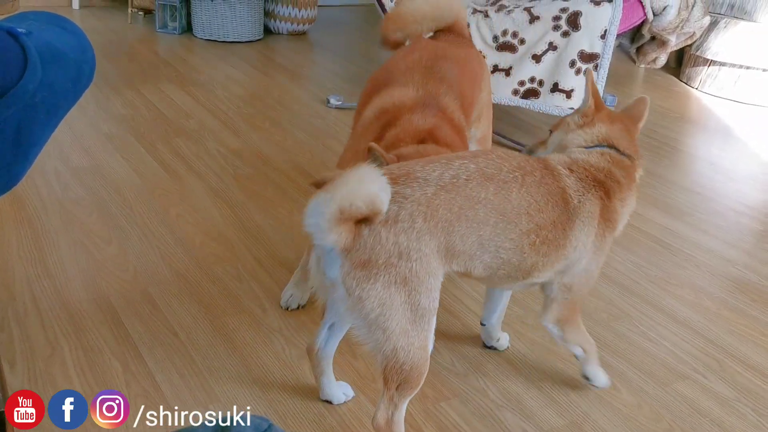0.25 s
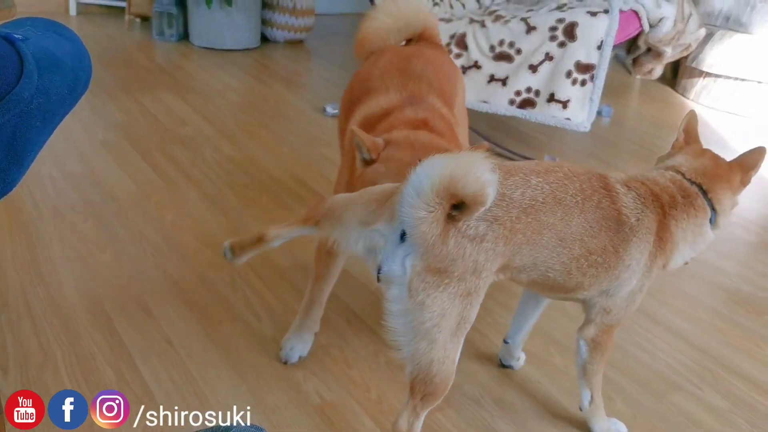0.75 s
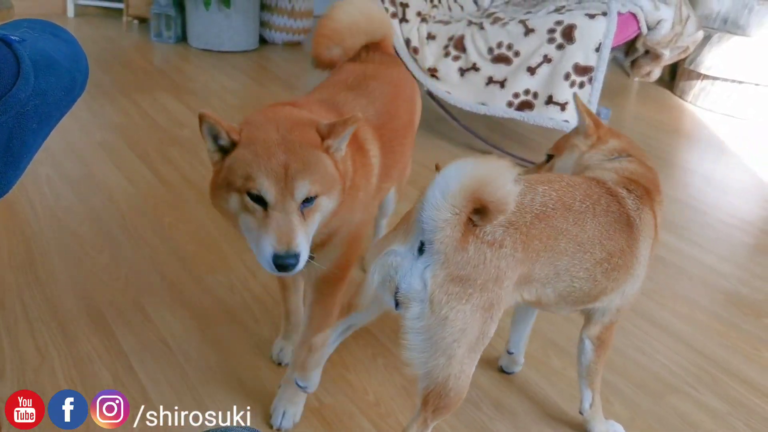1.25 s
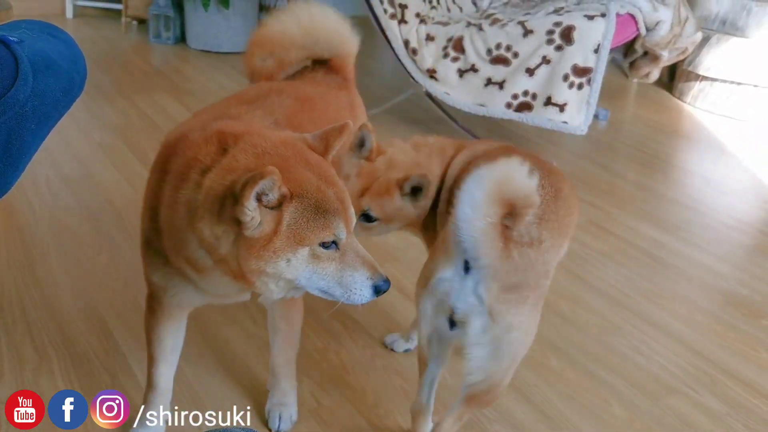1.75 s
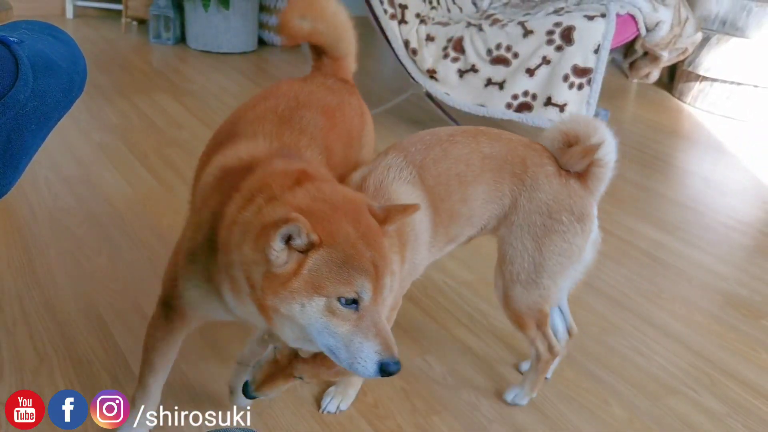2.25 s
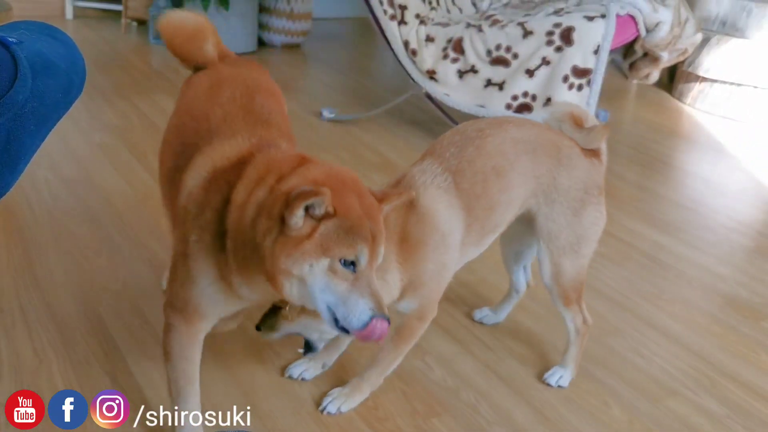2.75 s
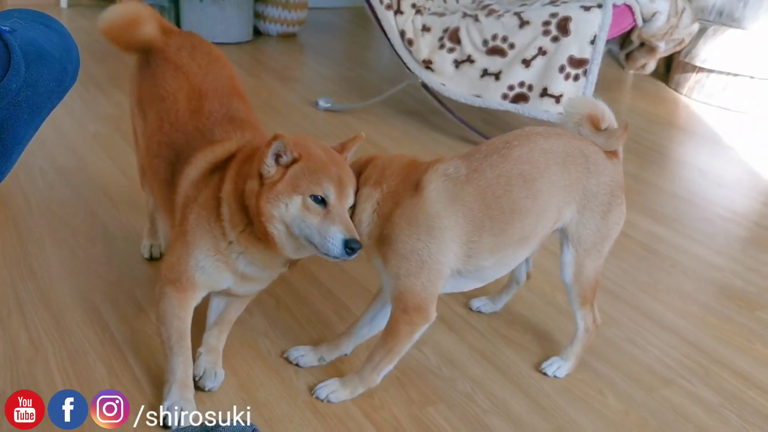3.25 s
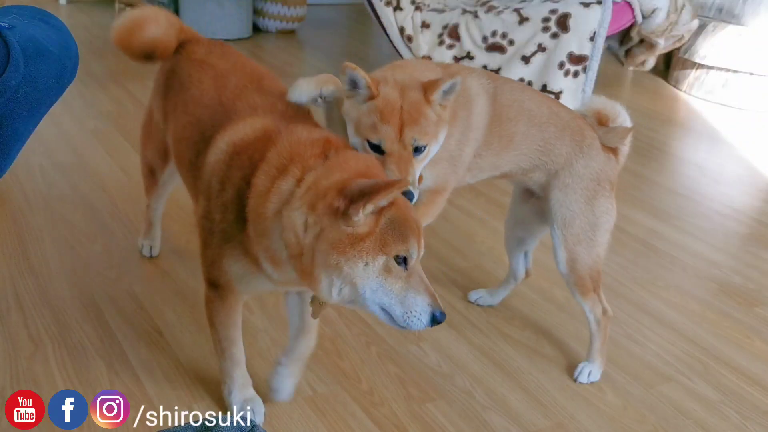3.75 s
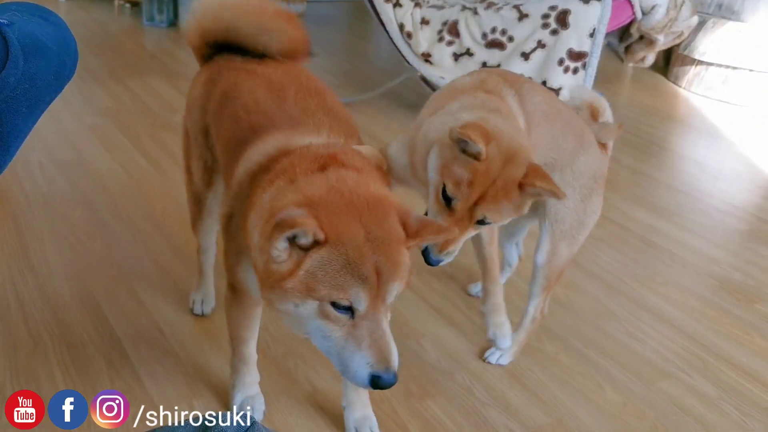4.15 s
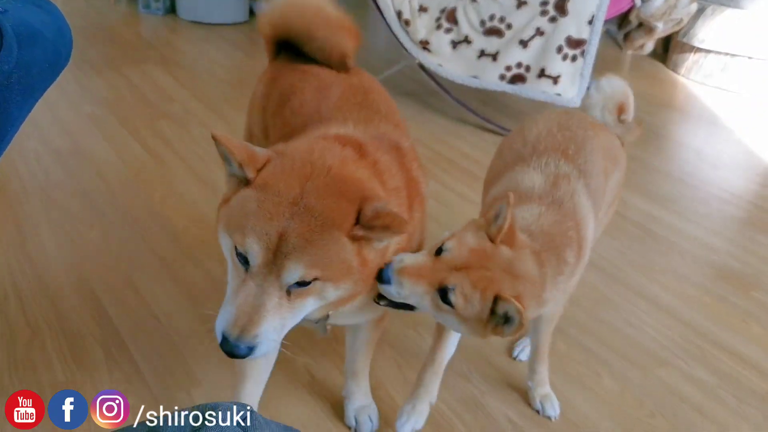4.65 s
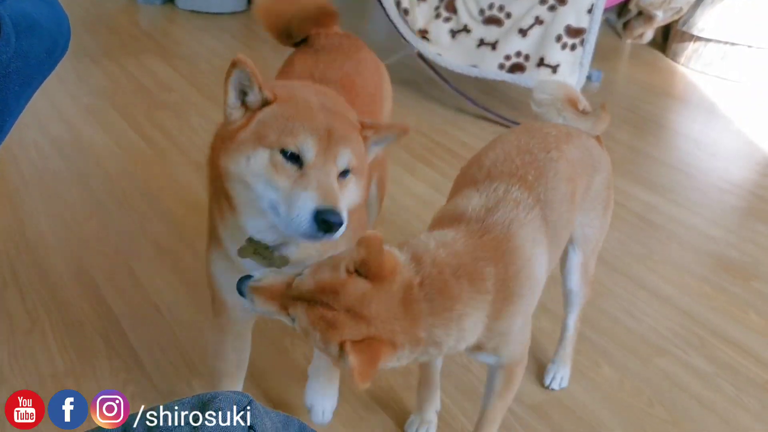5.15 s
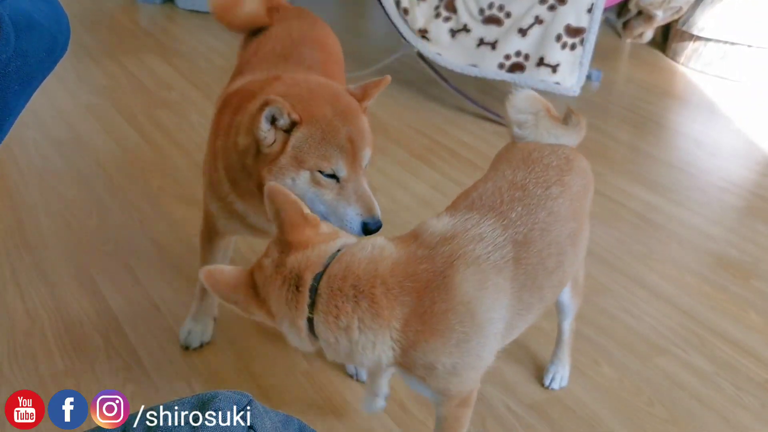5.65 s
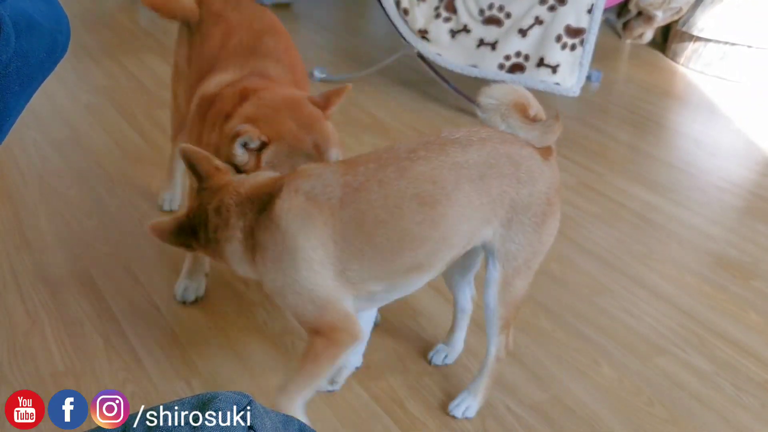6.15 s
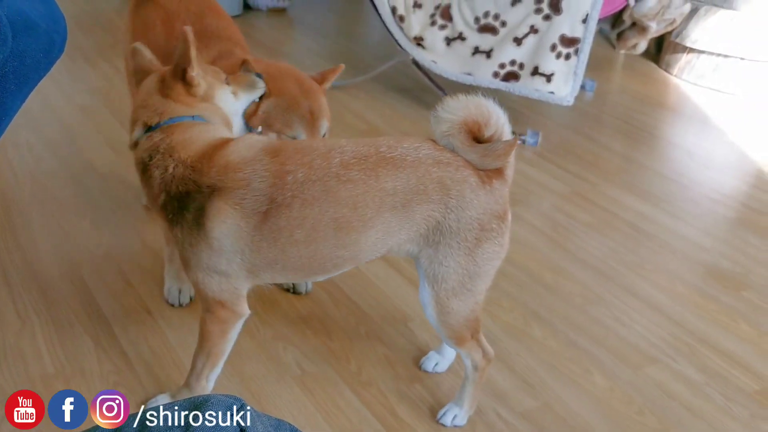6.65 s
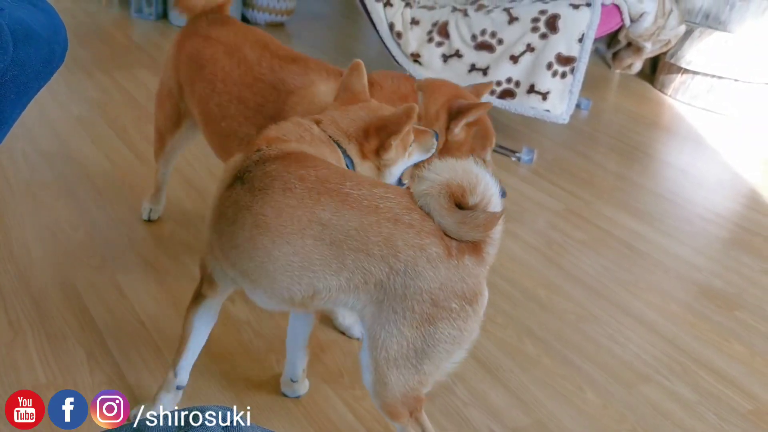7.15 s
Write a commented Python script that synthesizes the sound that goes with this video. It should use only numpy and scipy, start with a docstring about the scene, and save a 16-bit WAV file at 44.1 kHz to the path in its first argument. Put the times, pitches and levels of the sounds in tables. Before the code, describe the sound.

Sharp dog claws tick, skid and patter across hard boards close by, with a brief low growl, soft paw thuds and fur rustle.

```python
"""Dogs at play on a wooden floor

Two dogs tussle close to the microphone in a bare, echoing room. Stick-slip friction and impact ring
their claws and the boards; damped board notes give soft pads and hollow knocks; fur rustles past.
A loose collar fitting tinkles twice as narrow bands of noise, and two very bright snaps are short sines.
A low harmonic grumble sinks in pitch at the start, over floor booms, a faint rumble and room hiss."""
import sys
import numpy as np
from scipy import signal
from scipy.fft import rfft, irfft, next_fast_len
from scipy.io import wavfile
from scipy.ndimage import uniform_filter1d

SR = 44100
rng = np.random.default_rng(int(sys.argv[2]) if len(sys.argv) > 2 else 0)


def dump_mix(stems):
    """Bounce the given channels to the path in sys.argv[1] as a 16-bit WAV at rate SR."""
    frames = np.atleast_2d(stems).T  # one column per channel
    limited = np.clip(frames, -1, 1)  # hard clip at full scale
    pcm = np.round(limited * 32767).astype(np.int16)
    wavfile.write(sys.argv[1], SR, pcm)


N = 325878  # samples

# All event and spectrum levels below are relative; each source sets its own final gain.
# claws landing: (time [s], level [dB], treble snap [dB], left over right [dB])
CLAW_LANDINGS = [(0.2259, -22, -34, 3), (0.2445, -20.5, -21, -21), (0.376, -26, -15, -6),
                 (0.5437, -25, -5.5, -8), (0.618, -25, -16, -10), (0.629, -17.5, -16, -5),
                 (0.9587, -49, -15, -6), (1.2682, -28.5, -12, -9), (1.7514, -25.5, -4, -7),
                 (1.9508, -23, -22, -26.5), (1.9574, -21.5, -14, 4), (1.9994, -24, -4, -16),
                 (2.2866, -17, -22, -18.5), (2.294, -18.5, -5.5, 0), (2.5251, -16.5, -10, -9),
                 (2.6247, -17.5, -8, -7), (2.7525, -20.5, -26, 7), (2.8725, -22.5, -13.5, -6),
                 (2.8874, -33, -15, -24), (3.1018, -35, -10, -2), (3.1579, -20, -11, -8),
                 (3.5722, -31.5, -14, -1), (3.6651, -36.5, -13, -23), (3.742, -35, -9, -16),
                 (3.7792, -26.5, -9, -5), (4.0022, -24.5, -37, -4), (4.14, -37.5, -12.5, -11),
                 (4.566, -33, 1, -6), (4.6024, -21, -7.5, -7), (5.1582, -34, -25, -6),
                 (5.4864, -14.5, -5.5, -7.5), (5.679, -28.5, -11, -4), (5.7418, -21, -13, -1),
                 (5.7546, -25, -13.5, -14), (6.0689, -39, -12, -11), (6.1871, -16.5, -5, 0),
                 (6.2004, -28, -17, -7), (6.331, -15.5, -14, -12), (6.3489, -25.5, -5.5, 8),
                 (6.5235, -30.5, -5.5, 0), (6.7222, -38.5, -6.5, -7.5), (7.1052, -23.5, -18, -17),
                 (7.2771, -23.5, -3, -2), (7.2825, -25.5, -20, -16)]
# claws skidding: (time of hardest push [s], level [dB], rise [s], fall [s], pitch factor [ratio],
# left over right [dB])
CLAW_SKIDS = [(0.005, -38.5, 0.0088, 0.025, 0.98, -14), (0.243, -26, 0.012, .006, 1.06, -16),
              (0.41, -40, 0.032, .016, 1, -15), (0.72, -42.5, 0.051, 0.025, 0.89, -15),
              (1.296, -25.5, 0.009, 0.006, 0.93, -23), (1.437, -28, .0105, .006, 0.86, -16.5),
              (2.036, -32, 0.016, 0.0059, 0.99, -18), (2.121, -19.5, 0.0041, 0.014, 0.98, -7),
              (2.14, -23, .008, .02, 0.95, -19), (2.167, -23, .013, .015, 0.93, -3),
              (2.553, -33.5, 0.022, 0.0089, 0.94, 0), (2.645, -28, .013, 0.0078, 1.01, 6),
              (2.70, -28.5, 0.013, .01, 0.91, -12), (2.762, -26, .01, .0042, 1.08, -13),
              (2.94, -44, .028, 0.033, 1.03, -16), (3.178, -39.5, 0.0091, 0.056, 0.92, -16),
              (4.02, -38, 0.0086, 0.0044, 1.09, -23), (4.603, -35, .0066, 0.0023, 0.87, -4),
              (4.755, -29, .012, 0.013, .8, -4), (4.783, -26, .014, 0.0094, 0.73, -14.5),
              (4.935, -48, 0.011, 0.031, .98, -19.5), (5.176, -35.5, 0.0084, 0.0052, 0.98, -13.5),
              (5.224, -49, .012, .012, 1.08, -15), (5.626, -34, 0.01, 0.012, 0.92, -10),
              (5.80, -43.5, 0.028, 0.057, 1, -10), (6.39, -35, 0.031, .017, 0.88, -10),
              (7.065, -45.5, 0.035, 0.0086, 0.94, -4)]
# sharp snaps right by the microphone: (time [s], level [dB])
CLOSE_SNAPS = [(4.602, 2), (4.6066, -5)]
# pads landing on the boards: (time [s], level [dB], weight as lower over upper board note [dB])
PAD_LANDINGS = [(0.06, -46.5, 13), (0.139, -46, 8), (0.445, -50, 13), (2.30, -46, -6), (2.391, -53, -13),
                (2.47, -49.5, -6), (2.61, -55, -10), (2.70, -55.5, -15), (2.88, -55, -16), (3.37, -52, 5),
                (3.905, -51.5, 13), (4.602, -47, 1), (4.781, -53.5, -17), (6.05, -56.5, -6),
                (6.179, -50.5, 6), (6.29, -55.5, -4), (7.283, -49.5, 1.5)]
# collar tinkles: (time [s], level [dB], gain of the two lower notes [dB])
COLLAR_TINKLES = [(0.042, -33, -3.5), (5.347, -37, -22)]
# modes of the collar fitting: (frequency [Hz], level [dB], 60 dB decay time [s])
COLLAR_MODES = [(9600, 8.5, 0.053), (11100, 2, 0.12), (13440, -8, .22), (14150, -16, .14), (15450, -2, .1)]
# spectrum of a claw on the boards: (frequency [Hz], level [dB])
CLAW_SPECTRUM = [(100, -42), (400, -26), (750, -13.5), (1150, -13.5), (1800, -9.5), (2600, -4),
                 (3500, -2.5), (4600, 0.5), (5700, -3.5), (6600, -3), (7700, -11.5), (9500, -11.5),
                 (11500, -12.5), (15500, -23.5)]
# decay of the room: (frequency [Hz], 60 dB decay time [s])
ROOM_DECAY = [(150, 2.4), (700, 0.85), (1800, 0.7247), (4300, 0.6172), (8000, 0.55), (14000, 0.59)]
# spectrum of the late reverberation: (frequency [Hz], level [dB])
ROOM_SPECTRUM = [(150, -29), (750, 0.5), (1500, -4.5), (3000, 0.5), (4200, 4), (5800, 2), (8000, -1),
                 (14000, -8)]
# still air of the room: (frequency [Hz], level per Hz [dB])
AIR_SPECTRUM = [(15, -2), (25, 3), (45, 1), (62, -1), (84, 2.5), (110, -5), (170, -15), (260, -16),
                (450, -26.5), (800, -27.5), (2000, -33.5), (4500, -35.5), (7700, -43), (15000, -44)]
# likeness of left and right in a diffuse field: (frequency [Hz], correlation [ratio])
COHERENCE = [(60, 1), (150, 0.89), (300, 0.66), (700, 0.26), (2000, 0.013)]
# bearing of the paws: (time [s], lag of the left port [samples])
PAW_BEARING = [(0, 0), (1, 1), (2.1, 12), (4.3, 0), (5.2, 7), (7.3, 9)]
# extra bite of a claw that faces the microphone: (frequency [Hz], gain [dB])
FACING_BITE = [(1000, 5), (3300, 3), (4500, 2.5), (5600, 7.5), (7500, 0.5), (12000, 1)]
# fur and soft pads brushing past: (time of hardest push [s], level [dB], length scale [s])
FUR_BRUSHES = [(0.12, -48.5, 0.15), (1.2, -47.5, .1), (2.451, -46.5, 0.15), (3.316, -54, 0.047),
               (3.632, -47.5, 0.091), (3.946, -41, .08)]
# notes of the boards under a pad: (frequency [Hz], half-width [Hz], level [dB], decay constant [s])
BOARD_NOTES = [(226, 125, -1.5, 0.062), (775, 166, 4, 0.032)]
# short hollow knocks: (time [s], level [dB], pitch [Hz])
HOLLOW_KNOCKS = [(0.438, -36, 1126), (0.54, -37.5, 720), (2.03, -35, 860), (4.086, -44.5, 870),
                 (4.78, -33.5, 850), (5.345, -37.5, 1480)]
# floor booms as the dogs shift their weight: (time [s], level [dB])
FLOOR_BOOMS = [(1.56, -37.5), (1.79, -41.5), (2.1, -45.5), (2.9, -44), (3.6, -46.5), (3.78, -46),
               (4.04, -46), (4.48, -44.5), (5.36, -39), (5.85, -41.5), (6.22, -38), (6.5, -37.5),
               (6.84, -41), (7.19, -42.5)]

CLATTER_S = 0.0036  # decay constant of a soft landing's clatter, as the paw's other claws follow
FIRM_DB, CLATTER_HALVES_DB = -22.5, 11  # above this level a flatter paw halves the clatter per 11 dB
KNOCK_DB, KNOCK_PER_SNAP = -10.5, 0.49  # a harder landing also knocks the board more (dB per dB)
TAP_ROOM_DB, ROOM_PER_LEVEL = 1.37, -0.098  # fainter taps are further off: more room (dB per dB)
SKID_SNAP_DB, SNAP_DB_PER_OCTAVE = -9.5, 27  # a faster, higher skid also has more treble
SKID_BOARD_DB, BOARD_PER_LEVEL = -27.5, -0.28  # a hard skid rasps more than it knocks (dB per dB)
GRUMBLE_END_S, GRUMBLE_RELEASE_S = 0.779, 0.022
GRUMBLE_HZ, SAG_HZ_PER_S = 95.8, 40  # mean pitch at the start and its steady fall
GRUMBLE_DB, SWELL_DB_PER_S = -45.5, 9.5
BOOM_HZ, BOOM_HALF_WIDTH_HZ, BOOM_SWELL_S = 36.1, 7.4, 0.11
HISS_DB = -46.5
EDGE_HZ = 15750


def amp(db):
    """Logarithmic level: decibels become a linear gain."""
    return 10 ** (np.asarray(db) / 20)


def evened(x):
    """Power normalization: scales a signal to rms 1."""
    return x / np.sqrt(np.mean(x ** 2) + 1e-20)


def read(points, hz):
    """Logarithmic frequency scale: joins spectrum points with straight lines upon it."""
    f, value = np.transpose(points)
    return np.interp(np.log(hz + 1), np.log(f + 1), value)


def add(mix, s, sound):
    """Superposition: adds a stereo sound to the mix at time s, clipped to its bounds."""
    start = round(s * SR)
    sound = sound[:, max(-start, 0):]
    part = mix[:, max(start, 0):][:, :sound.shape[1]]
    part += sound[:, :part.shape[1]]


def causal(gain, size=1024):
    """Minimum phase: the quickest-starting impulse response with this spectrum."""
    log_gain = np.log(np.maximum(np.r_[gain, gain[-2:0:-1]], 1e-5))
    return np.fft.ifft(np.exp(np.conj(signal.hilbert(log_gain)))).real[:size]


def ringing_noise(hz, half_width_hz, size):
    """Resonance: white noise through one peak, down to half amplitude at the half-width, rms 1."""
    f = np.fft.rfftfreq(size, 1 / SR)
    peak = 1 / (1 + ((f - hz) / half_width_hz) ** 2)
    return evened(irfft(rfft(rng.standard_normal(size)) * peak, size))


def placed(sound, pan_db, s=0):
    """Interaural-style cues: a level difference, and a left lag as the dogs move about to the right."""
    lag = round(np.interp(s, *np.transpose(PAW_BEARING)))
    left = np.pad(sound, (lag, 0)) * amp(pan_db / 2)
    right = np.pad(sound, (0, lag)) * amp(-pan_db / 2)
    return np.array([left, right])


def claw(force, snap_db, board_db, grain_db, uneven_db, pitch=1):
    """Stick-slip excitation: tiny slips under a force ring claw and board, beamed and spread."""
    hz = np.fft.rfftfreq(2048, 1 / SR)
    treble = read([(6200, 0), (9000, snap_db + 16.5)], hz)
    bass = read([(900, board_db + 21), (2500, 0)], hz)
    colour = read(CLAW_SPECTRUM, hz / pitch) + treble + bass
    grain = amp(grain_db * np.minimum(rng.exponential(1, len(force)), 3))
    slips = force * rng.standard_normal(len(force)) * grain
    # the slips are so brief that together they excite all pitches evenly
    spectrum = rfft(np.pad(slips, (64, 512)))
    power = uniform_filter1d(abs(spectrum) ** 2, size=len(spectrum) // 26)
    slips = irfft(spectrum / np.sqrt(abs(power) + 1e-20))[48:]
    # each contact beams some pitches more than others; over all directions this averages out
    lobes = np.interp(hz, [800, 3000], [0, 1])  # long waves spread evenly
    unevenness = evened(uniform_filter1d(rng.standard_normal(len(hz)), size=22))
    beam = read(FACING_BITE, hz) + uneven_db * lobes * unevenness
    sounds = np.array([signal.fftconvolve(slips, causal(amp(db))) for db in (colour + beam, colour)])
    return sounds * np.linalg.norm(force) / np.linalg.norm(sounds, axis=1, keepdims=True)


def rung(sound, amount, ring_hz=5300, ring_q=4, ring=2.9):
    """Modal ringing: the claw's own note stands out of a contact, at unchanged total energy."""
    note = signal.lfilter(*signal.iirpeak(ring_hz, ring_q, SR), sound)
    out = sound + ring * amount * note
    return out * np.linalg.norm(sound) / np.linalg.norm(out)


def stroke(rise, fall, catch_db):
    """Stick-slip force: it builds, lets go and catches every few milliseconds; also its lead in s."""
    t = np.arange(-3 * rise, 4 * fall, 1 / SR)
    push = np.exp(np.where(t < 0, t / rise, -t / fall))
    force = push * amp(catch_db * ringing_noise(316, 140, len(t)))
    return force * np.linalg.norm(push) / np.linalg.norm(force), -t[0]


def thud(hz, half_width_hz, decay, rise=0.00087, judder_db=4):
    """Damped resonance: one dull note of wood that judders as it dies."""
    t = np.arange(SR // 3) / SR
    blow = (1 - np.exp(-t / rise)) * np.exp(-t / decay)
    judder = amp(judder_db * ringing_noise(24, 63, len(t)))
    note = blow * judder * ringing_noise(hz, half_width_hz, len(t))
    return note * np.linalg.norm(blow) / np.linalg.norm(note)


def air():
    """Diffuse field: steady rumble, alike in both ports, and a hiss that is largely independent."""
    size = next_fast_len(N)
    hz = np.fft.rfftfreq(size, 1 / SR)
    a, b = rfft(rng.standard_normal((2, size))) * amp(read(AIR_SPECTRUM, hz))
    same = np.clip(read(COHERENCE, hz), -1, 1)
    right_db = read([(120, -2.5), (500, 2.5), (6000, 2.5), (12000, 6.0)], hz)
    right = (same * a + np.sqrt(1 - same ** 2) * b) * amp(right_db)
    return amp(HISS_DB) * evened(irfft([a, right], size)[:, :N])


def grumble(jitter=0.095, shimmer=0.48, overtone_db=-13, rasp_db=-13):
    """Harmonic series: an unsteady low tone sinks, swells and stops, with weak overtones and rasp."""
    t, out = np.arange(SR) / SR, np.zeros((2, N))
    pitch_hz = (GRUMBLE_HZ - SAG_HZ_PER_S * t) * (1 + jitter * ringing_noise(18.7, 9.6, len(t)))
    turns = np.cumsum(pitch_hz) / SR
    overtones = sum(np.sin(2 * np.pi * k * turns) / np.sqrt(k) for k in range(2, 5))
    tone = np.sin(2 * np.pi * turns) + amp(overtone_db) * overtones
    rasp = amp(rasp_db) * ringing_noise(270, 110, len(t))
    sound = evened(tone) * amp(SWELL_DB_PER_S * t) + rasp
    release = np.exp(-np.maximum(t - GRUMBLE_END_S, 0) / GRUMBLE_RELEASE_S)
    flutter = 1 + shimmer * ringing_noise(7.9, 5.9, len(t))
    add(out, 0, placed(amp(GRUMBLE_DB) * sound * release * flutter, 3.0))
    return out


def skids(level_db=-1):
    """Stick-slip friction: a paw pushes harder until its claws let go, catching on the grain."""
    near, far = np.zeros((2, 2, N))
    for s, db, rise, fall, pitch, pan_db in CLAW_SKIDS:
        force, lead = stroke(rise, fall, catch_db=3.5)
        snap_db = SKID_SNAP_DB + SNAP_DB_PER_OCTAVE * np.log2(pitch)
        board_db = SKID_BOARD_DB + BOARD_PER_LEVEL * db
        contact = claw(force, snap_db, board_db, grain_db=7.5, uneven_db=1.6, pitch=pitch)
        beamed, spread = amp(db + level_db) * contact
        brief = np.interp(rise + fall, [.012, .024], [1, 0])  # a quick flick leaves the claw free to ring
        add(near, s - lead, placed(rung(beamed, brief), pan_db, s))
        add(far, s - lead, spread[None])
    return np.array([near, far])


def brushes(level_db=-1, rise_share=.35, fall_share=0.7, pan_db=-7, room_db=2):
    """Broadband friction: fur and pads slide softly in a rustle with little of the claws' note."""
    near, far = np.zeros((2, 2, N))
    for s, db, length in FUR_BRUSHES:
        force, lead = stroke(rise_share * length, fall_share * length, catch_db=1)
        contact = claw(force, snap_db=-5.5, board_db=-3.0, grain_db=5.5, uneven_db=-4.2)
        beamed, spread = amp(db + level_db) * contact
        add(near, s - lead, placed(beamed, pan_db, s))
        add(far, s - lead, spread[None] * amp(room_db))
    return np.array([near, far])


def patter(level_db=-24, spread_s=0.041, decay_s=0.001, room_db=-4, count=3):
    """Random impacts: around each skid, single claws tick lightly at scattered times and levels."""
    near, far = np.zeros((2, 2, N))
    force = np.exp(-np.arange(256) / SR / decay_s)
    draws = rng.standard_normal((len(CLAW_SKIDS), count, 2))
    for (s, db, *_, pan_db), ticks in zip(CLAW_SKIDS, draws):
        for offset, size in ticks:
            at = s + spread_s * (.6 + offset)
            tick = claw(force, snap_db=-11, board_db=-17, grain_db=7.5, uneven_db=5)
            beamed, spread = amp(level_db + 0.41 * db + 2 * size) * tick
            add(near, at, placed(beamed, pan_db, at))
            add(far, at, spread[None] * amp(room_db))
    return np.array([near, far])


def tinkles(half_width_hz=170, room_db=-4):
    """Modal decay: a small, loose metal fitting rattles in high, brief bands of noise."""
    out, t = np.zeros((2, N)), np.arange(SR // 2) / SR
    for s, level_db, low_db in COLLAR_TINKLES:
        ring = np.zeros(len(t))
        for k, (hz, db, t60) in enumerate(COLLAR_MODES):
            decay_db = db + low_db * (k < 2) - 60 * t / t60
            ring += amp(decay_db) * ringing_noise(hz, half_width_hz, len(t))
        add(out, s, amp(level_db - 10) * placed(ring, -10.0, s))
    return np.array([out, out * amp(room_db)])


def pads(room_db=-2):
    """Soft impact: paws ring the boards, and more weight favours the lower note."""
    out = np.zeros((2, N))
    for s, level_db, weight_db in PAD_LANDINGS:
        notes = sum(amp(db + lean * weight_db) * thud(hz, half_width, decay)
                    for (hz, half_width, db, decay), lean in zip(BOARD_NOTES, (.5, -.5)))
        add(out, s, amp(level_db) * placed(notes, 0, s))
    return np.array([out, out * amp(room_db)])


def taps(level_db=-6.0, strike=1.55, strike_s=0.00054, rise_s=0.00045, near_pan_db=-2):
    """Hard impact: one claw strikes and others clatter after; a blunt landing rings more than snaps."""
    near, far = np.zeros((2, 2, N))
    t = np.arange(SR // 16) / SR
    for s, db, snap_db, pan_db in CLAW_LANDINGS:
        quick = 2 ** (max(db - FIRM_DB, 0) / CLATTER_HALVES_DB)
        clatter = np.exp(-t * quick / CLATTER_S)
        force = (clatter + strike * np.exp(-t / strike_s)) * (1 - np.exp(-t / rise_s))
        board_db = KNOCK_DB + KNOCK_PER_SNAP * snap_db
        contact = claw(force * np.sqrt(quick), snap_db, board_db, grain_db=5.5, uneven_db=6)
        beamed, spread = amp(db + level_db) * contact
        blunt = np.interp(snap_db, [-24, -10], [1, 0])
        add(near, s, placed(rung(beamed, blunt), pan_db + near_pan_db, s))
        add(far, s, spread[None] * amp(TAP_ROOM_DB + ROOM_PER_LEVEL * db))
    return np.array([near, far])


def knocks(half_width=0.24, decay=0.0077, room_db=-1):
    """Heavily damped resonance: brief hollow knocks as the dogs bump about."""
    out = np.zeros((2, N))
    for s, db, hz in HOLLOW_KNOCKS:
        add(out, s, amp(db) * placed(thud(hz, half_width * hz, decay), 0.27, s))
    return np.array([out, out * amp(room_db)])


def boom(pan_db=2):
    """Fundamental mode: the whole floor sways at its lowest note as the dogs shift their weight."""
    t = np.arange(N) / SR
    sway = signal.hilbert(ringing_noise(BOOM_HZ, BOOM_HALF_WIDTH_HZ, next_fast_len(N)))[:N]
    sway = evened(sway.real / (abs(sway) + 0.31))  # evens out the random envelope
    swell = sum(amp(db) * np.exp(-((t - s) / BOOM_SWELL_S) ** 2) for s, db in FLOOR_BOOMS)
    return placed(sway * swell, pan_db)[:, :N]


def snaps(hz=12000, peak_s=0.0001, pan_db=-7, room_db=-5):
    """Transient oscillation: a hard, very bright tick only a few cycles long."""
    out, t = np.zeros((2, N)), np.arange(SR // 100) / SR
    tick = t / peak_s * np.exp(1 - t / peak_s) * np.sin(2 * np.pi * hz * t)
    for s, db in CLOSE_SNAPS:
        add(out, s, amp(db - 8.5) * placed(tick, pan_db, s))
    return np.array([out, out * amp(room_db)])


def room(x, tail_db=-0.5, early_db=-6, early_s=0.0074, build_s=0.0061, pan_db=-2):
    """Reverberation: quick bounces off floor and furniture, then a long bright tail from bare walls."""
    t = np.arange(SR) / SR
    mono, out = x.mean(0), np.zeros((2, N))
    for k in range(3):
        # the dogs keep moving, so the pattern of echoes keeps changing
        share = np.sqrt(2 / 3) * np.cos(np.pi * (1.3 * np.arange(N) / SR + k / 3))
        echoes = rng.standard_normal((2, SR)) * (rng.random((2, SR)) < .15)
        hz, when, z = signal.stft(echoes, SR, nperseg=256)
        same = np.clip(read(COHERENCE, hz), -1, 1)[:, None]
        z[1] = same * z[0] + np.sqrt(1 - same ** 2) * z[1]
        decay_db = -60 * when / read(ROOM_DECAY, hz)[:, None]
        z = z * amp(read(ROOM_SPECTRUM, hz)[:, None] + decay_db)
        tail = signal.istft(z, SR, nperseg=256)[1][:, :SR] * (1 - np.exp(-t / build_s))
        early = echoes * np.exp(-t / early_s) * (t > .0005)
        response = sum(amp(db) * r / np.linalg.norm(r, axis=1, keepdims=True)
                       for db, r in [(tail_db, tail), (early_db, early)])
        out += signal.fftconvolve((mono * share)[None], response, axes=1)[:, :N]
    return out * amp([[pan_db / 2], [-pan_db / 2]])


def scene():
    """Direct and reverberant field: paws, fur and collar arrive directly and by way of the room."""
    near, far = skids() + brushes() + patter() + tinkles() + pads() + taps() + knocks() + snaps()
    # the right channel of the far sound feeds the room
    return near + room(far[1:]) + air() + grumble() + boom()


def record(dry):
    """Band limitation: a recorder's linear-phase low-pass filter."""
    low_pass = signal.firwin(511, EDGE_HZ, window=("kaiser", 9), fs=SR)
    return signal.oaconvolve(dry, low_pass[None], "same")


dry = scene()
out = record(dry)
dump_mix(out)
```